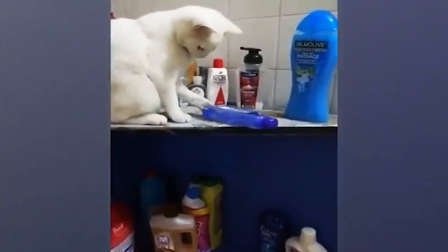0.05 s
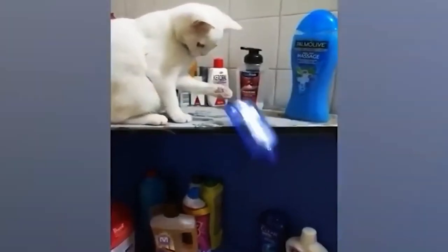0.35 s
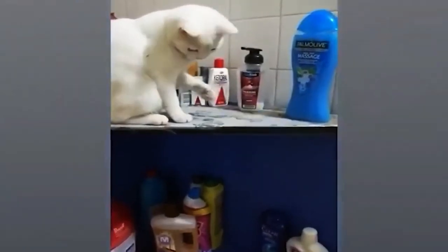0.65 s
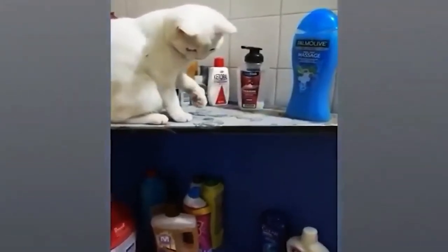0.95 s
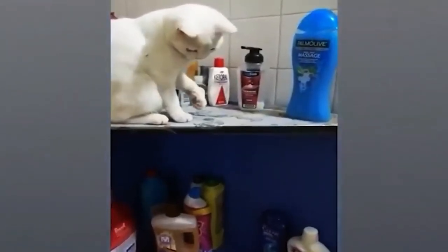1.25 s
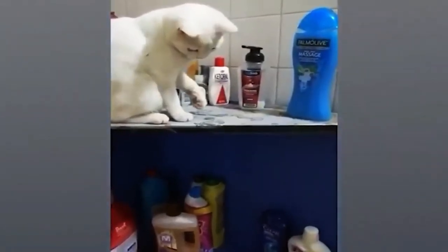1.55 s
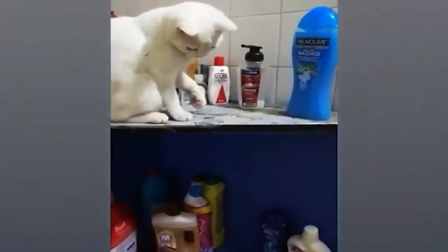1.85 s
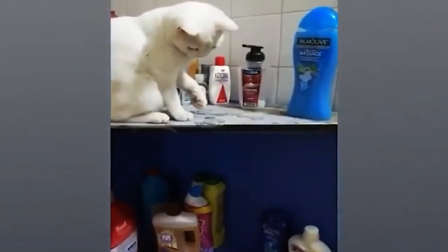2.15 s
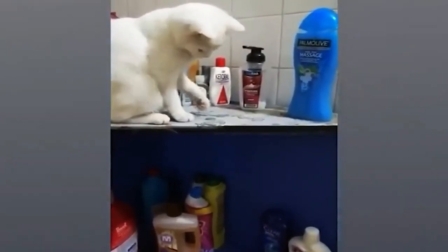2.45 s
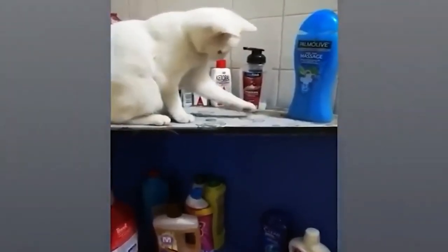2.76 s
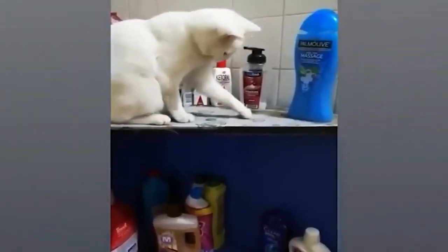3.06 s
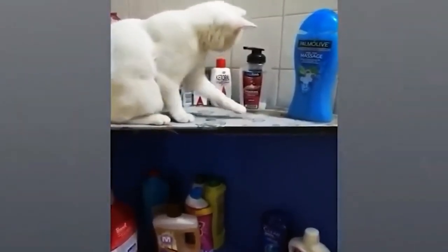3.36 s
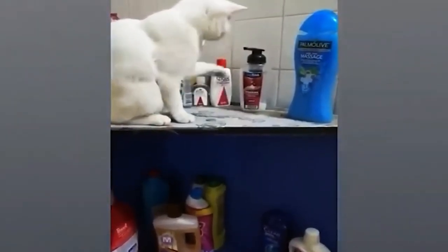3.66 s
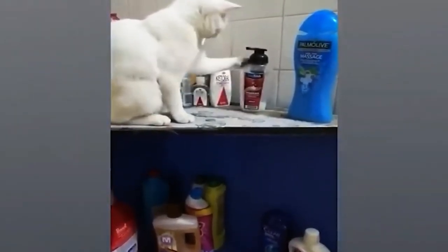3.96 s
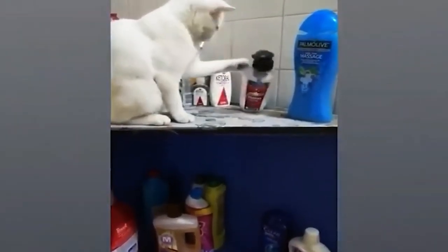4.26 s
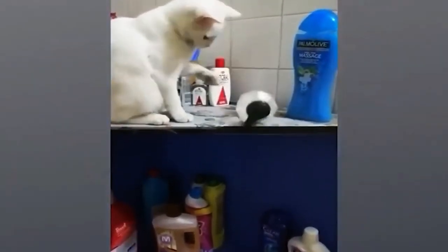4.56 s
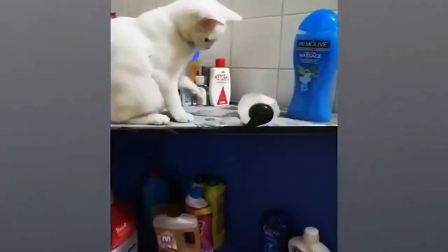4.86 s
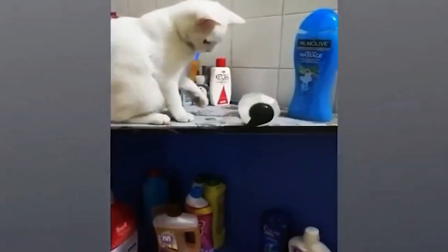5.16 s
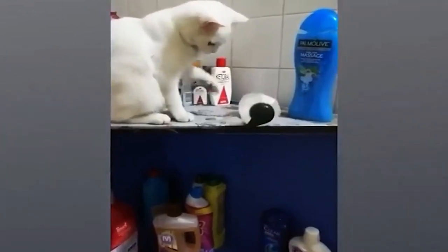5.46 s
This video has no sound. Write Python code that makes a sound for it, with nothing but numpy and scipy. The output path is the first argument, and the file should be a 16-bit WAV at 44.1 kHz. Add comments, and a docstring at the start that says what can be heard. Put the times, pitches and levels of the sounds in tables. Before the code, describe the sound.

A plastic bottle grazes a cupboard and lands on a hard floor with a sharp smack and quick clatter, making the small tiled bathroom boom. After a pause, a cat's paw makes faint taps and clicks. A second bottle then tips over, thuds on a hollow shelf, bounces and rattles to rest. The hand-held phone picks up soft handling bumps over a low rumble and hiss.

```python
"""A small tiled bathroom, heard from inside it on a hand-held phone whose right port faces away.
A cat slides a plastic bottle off a shelf; it grazes the cupboard, smacks on the hard floor at 0.8 s
with shell and cap, and the room booms. From 3 s the cat taps a pump bottle; at 4.6 s it tips over,
thuds on the hollow shelf, bounces and rattles to rest. Throughout, the hand bumps the phone softly
over a low building rumble and the hiss of the ports."""
import sys
import numpy as np
from scipy import signal
from scipy.fft import rfft, irfft
from scipy.io import wavfile

SR = 44100
rng = np.random.default_rng(int(sys.argv[2]) if len(sys.argv) > 2 else 0)


def store_pcm(level_fs):
    """Save levels as 16-bit WAV."""
    pcm = np.round(np.clip(level_fs, -1, 1) * 32767).astype(np.int16)
    wavfile.write(sys.argv[1], SR, np.atleast_2d(pcm).T)


N = 242902
TIME = np.arange(N) / SR
TOP_HZ = 13100  # upper limit of the phone

# Levels are relative within each table.
# the bottle lands on side and base in quick turns, then bounces softly: start_s, level_db, contact_ms
FLOOR_HITS = [(0.7736, 3.5, .16), (0.776, 6.5, .08), (0.78, 5, 0.23), (0.7864, -0.5, 0.072),
              (0.7941, 3.5, .16), (0.8057, -2, 0.099), (0.858, -3, 2.6), (1.012, -19.5, 0.18)]
# its cap clacks on the floor, favouring the modes near one pitch: start_s, level_db, favoured_hz
CAP_CLACKS = [(0.7728, 6, 8600), (0.773, 1.5, 5560), (0.7785, -2, 7500), (0.783, -6, 4850),
              (0.7855, -4, 7400), (0.7875, -2, 9200), (0.7905, -1, 8200), (0.799, -8, 8600)]
# the bottle's hollow body: pitch_hz, level_db, t60_s
BOTTLE_MODES = [(316, -11, .1), (443, -11, .07), (691, 3, .09), (897, 7.5, .09), (1107, 0, .11),
                (1340, -2, .06), (1597, -3, .07), (1708, -6, .06), (1815, 1, .07), (2060, 0, .06),
                (2228, 0, .08), (3010, 3.5, .045), (3290, -1, .05), (3920, -7, .03)]
# its hard cap: pitch_hz, level_db, t60_s
HARD_CAP_MODES = [(4850, -3, .045), (5560, 3, .022), (7450, 0, .028), (8270, 1, .02), (8750, 0, .022),
                  (9200, -3, .018), (10270, -3, .03)]
# its dense wall modes: frequency_hz, level_db
SHELL_SPECTRUM = [(50, -40), (100, -24), (180, -15.5), (300, -8.5), (550, 2), (800, 4.5), (1400, 2),
                  (2200, 6.5), (3100, -0.5), (3900, -3), (6000, -12.5), (9000, -12.5), (13000, -22)]
# the snap of hard plastic: frequency_hz, level_db
SNAP_SPECTRUM = [(200, -11.5), (800, -6.5), (1600, -2), (3700, -14.5), (4500, -5.5), (5600, -14.5),
                 (7500, 4.5), (9300, 2), (10300, -35), (13000, -23)]
# the falling bottle grazes the cupboard: start_s, level_db
CUPBOARD_GRAZES = [(0.559, -25.5), (0.581, -35)]
# the colour of a graze: frequency_hz, level_db
GRAZE_SPECTRUM = [(150, -12), (500, -16.5), (1400, -9), (2300, 5.5), (3200, -10), (5000, -16.5),
                  (12000, -27)]
# paw taps, then the pump bottle falls, bounces and settles: start_s, thud_db, click_db, contact_ms
SHELF_KNOCKS = [(2.979, -53, -37, .6), (2.9887, -51, -28.5, 0.44), (3.4338, -30, -9, 0.11),
                (3.44, -37, -24, 0.48), (4.6286, -16.5, -23.5, 0.59), (4.631, 9.5, -21.5, 0.86),
                (4.641, 3, -26.5, 2.9), (4.746, 5, -14, 5.1), (4.748, 0, -10.5, 3.2),
                (4.757, 0.5, -19, 4.5), (4.7637, -40, -20.5, 2.8), (4.788, -2.5, -16.5, 3.4),
                (4.8286, -12.5, -20, 0.76), (4.873, -26, -24, 0.64)]
# the hollow shelf: pitch_hz, level_db, t60_s
HOLLOW_SHELF_MODES = [(100, -4, .44), (123, -10, .16), (142, -14, .18), (185.5, 3.5, .32), (205, 5.5, .29),
                      (244, -5, .24), (304, -10, .16), (339, 1, .14), (395, -10, .2), (452, -8, .18),
                      (515, -9, .16), (1020, -1, .07), (1104, 1, .08), (1265, -3, .06), (1480, -6, .04)]
# the dense modes of its board: frequency_hz, level_db
BOARD_SPECTRUM = [(30, -28), (70, 17), (130, 7), (250, -5.5), (450, -1.5), (650, -4), (850, -4),
                  (1150, -2.5), (1550, -15.5), (2200, -17.5), (3100, -9.5), (4000, -27), (10000, -18.5)]
# a plastic edge ticks on the shelf: frequency_hz, level_db
TICK_SPECTRUM = [(300, -28), (900, -10), (1700, -10), (3400, -6), (4700, -1.5), (6200, -4.5), (7500, 0.5),
                 (9200, 1), (10300, -7.5), (12500, -14)]
# plastic slides, the paw swipes, the pump bottle rolls: start_s, length_s, level_db, low_edge_hz
SHELF_SLIDES = [(0.0, 0.14, -63, 1490), (0.275, 0.11, -64.5, 2500), (0.382, 0.078, -58.5, 2580),
                (2.981, 0.015, -52.5, 5050), (2.991, 0.0062, -52.5, 4580), (4.786, 0.039, -53, 5000),
                (4.864, 0.014, -49.5, 6500)]
# the room's standing waves: pitch_hz, level_db, t60_s
STANDING_WAVES = [(100, -10, 1.1), (160.6, 0, .52), (186, -9, .6), (214, -6, .5), (261, -2, .7),
                  (302, -3, .54)]
# decay of the room's diffuse tail: frequency_hz, t60_s
TAIL_DECAY = [(100, .65), (300, .58), (800, .49), (2000, .5), (4000, .47), (8000, .4), (13000, .33)]
# the colour of that tail: frequency_hz, level_db
TAIL_SPECTRUM = [(50, -10.5), (150, 6), (300, -1), (500, -4.5), (800, 0.5), (1200, -4.5), (2200, -11.5),
                 (4000, -7), (8000, -5), (13000, 0.5)]
# what the phone's body lets through to the right port: frequency_hz, gain_db
PHONE_SHADOW = [(100, 1), (300, 1), (450, -3), (650, -10), (1200, -11.5), (2200, -8), (3300, -21.5),
                (5500, -19.5), (8000, -32), (12000, -39)]
# the hand on the phone, higher in pitch for a harder touch: start_s, level_db, pitch_hz
HAND_BUMPS = [(0.262, -30, 148), (0.583, -29, 182), (1.432, -16.5, 117), (2.04, -20, 109.6),
              (2.321, -18, 170), (2.325, -5.5, 84.5), (2.409, -13.5, 245), (2.542, -13.5, 90.3),
              (3.114, -18, 107.4), (3.467, -16.5, 93.4), (4.089, -16, 106.2)]
# building rumble and port hiss: frequency_hz, level_db
HUSH_SPECTRUM = [(12, -32), (20, -1), (82, 0.5), (123, -11), (249, -16), (270, -18.5), (309, -19),
                 (531, -26.5), (696, -25), (1410, -23.5), (1950, -27.5), (9390, -29.5), (13000, -38.5)]


def bottle_clatter():
    """The bottle grazes the cupboard, then slaps the floor: its springy wall chatters, its cap cracks."""
    grazes = blows([(s, db, 0) for s, db in CUPBOARD_GRAZES],
                   lambda: burst(GRAZE_SPECTRUM, t60=0.22, crack=0.5))
    chatter = rebounds(FLOOR_HITS, gap_s=0.0033, loss_db=0.5)
    slaps = blows(chatter, lambda: burst(SHELL_SPECTRUM, t60=0.019, crack=0.14))
    cracks = blows([(s, db, 0) for s, db, _ in CAP_CLACKS],
                   lambda: burst(SNAP_SPECTRUM, t60=0.008, crack=0.3))
    return grazes + undb(-3.7) * slaps + undb(-6) * cracks


def bottle_ring(falloff_db_per_octave=35, cap_rise_s=0.004):
    """Each contact rings the flexing body for an instant; the cap's ping jumps in pitch between clacks."""
    out = undb(1) * blows(FLOOR_HITS, lambda: struck(BOTTLE_MODES, detune=0.013))
    for s, db, favoured_hz in CAP_CLACKS:
        modes = [(hz, level - falloff_db_per_octave * abs(np.log2(hz / favoured_hz)), t60)
                 for hz, level, t60 in HARD_CAP_MODES]
        ping = unit(struck(modes) * (1 - fade(cap_rise_s)))
        add(out, s, undb(db) * ping)
    return out


def shelf_thuds():
    """Paw and pump bottle drum on the hollow shelf, and the bottle's rocking roughens each thud."""
    knocks = [(s, db, ms) for s, db, _, ms in SHELF_KNOCKS]
    drum = blows(knocks, lambda: struck(HOLLOW_SHELF_MODES, sharp=0.027))
    rattle = blows(rocking(knocks), lambda: burst(BOARD_SPECTRUM, t60=0.27, crack=0.51))
    return undb(-9) * drum + undb(-10.5) * rattle


def shelf_clicks(times_quicker=6.7):
    """Plastic edges tick on the shelf, letting go much sooner than the weight does."""
    edges = rocking([(s, db, ms / times_quicker) for s, _, db, ms in SHELF_KNOCKS])
    return blows(edges, lambda: burst(TICK_SPECTRUM, t60=0.008, crack=1.3))


def rocking(knocks):
    """The pump bottle rocks onto its other edge after each knock, weaker each time."""
    return rebounds(knocks, gap_s=0.0074, loss_db=20)


def shelf_slides(attack_s=0.006, release_s=0.025):
    """Sliding is a stream of tiny slips that swells, holds and dies away with each push."""
    slips = rng.standard_normal(N) * undb(3.3 * rng.exponential(size=N))
    scrape = colour(slips, [(300, -22.5), (1800, -13.5), (3000, -5), (5000, -3.5),
                            (8000, 0.5), (10500, -6.5), (12500, -14)])
    scrape = np.sqrt(N) * unit(scrape)
    out = np.zeros(N)
    for s, length, db, edge_hz in SHELF_SLIDES:
        swell = np.clip((TIME - s) / attack_s, 0, 1)
        release = np.clip(1 - (TIME - s - length) / release_s, 0, 1)
        out += undb(db) * swell * release * passband(scrape, "high", edge_hz)
    return out


def room_boom(build_s=0.42):
    """The landing wakes the small room's standing waves, a hollow boom that swells and lingers."""
    boom = unit(ring(STANDING_WAVES) * (1 - fade(build_s)))
    out = np.zeros(N)
    add(out, FLOOR_HITS[0][0], undb(1.5) * boom)
    return out


def tiled_corner(sound):
    """A sound with its quick reflections from the tiles and bottles right behind the shelf."""
    flutter = rng.standard_normal(SR) * fade(t60=0.25) * (1 - fade(t60=0.02))
    return sound + undb(-0.5) * convolve(sound, unit(flutter))


def diffuse_tail(build_s=0.13):
    """Dense reflections off the tiles; the treble dies first."""
    spectrum, hz = rfft(rng.standard_normal(SR)), np.arange(SR // 2 + 1)
    tail = 0
    for centre_hz, t60 in TAIL_DECAY:
        band = along([(f, float(f == centre_hz)) for f, _ in TAIL_DECAY], hz)
        tail = tail + irfft(spectrum * band, SR) * fade(t60)
    return unit(colour(tail * (1 - fade(build_s)), TAIL_SPECTRUM))


def bathroom_at_phone(direct, sent, alike_hz=800, lag_s=0.0006):
    """Direct sound and room at two ports that share only the low reflections; the right is shaded."""
    left_tail, other_tail = diffuse_tail(), diffuse_tail()
    alike = 1 / (1 + (np.arange(SR // 2 + 1) / alike_hz) ** 2)
    right_tail = irfft(alike * rfft(left_tail) + np.sqrt(1 - alike ** 2) * rfft(other_tail), SR)
    left, right = (direct + convolve(sent, tail) for tail in (left_tail, right_tail))
    late_right = np.interp(TIME - lag_s, TIME, right)  # the way round the phone
    shade = undb(along(PHONE_SHADOW, np.fft.rfftfreq(N, 1 / SR)))
    return np.array([left, irfft(rfft(late_right) * shade, N)])


def hand_bumps(soft_hz=109, soft_t60_s=0.054, soft_top_hz=127, fidget_count=9, fidget_db=-32.5):
    """Handling knocks reach both ports through the case; the harder, the shorter and brighter."""
    fidgets = [(when * N / SR, fidget_db + 1 - 2 * softness, soft_hz)
               for when, softness in rng.random((fidget_count, 2))]
    out = np.zeros(N)
    for s, db, hz in HAND_BUMPS + fidgets:
        hardness = hz / soft_hz
        knock = ring([(hz, 0, soft_t60_s / hardness ** 1.8)])
        top_hz = min(soft_top_hz * hardness ** 3.3, TOP_HZ)
        add(out, s, undb(db) * passband(knock, "low", top_hz))
    return out


def hush(crossover_hz=260, level_db=-61.8):
    """Low building rumble, alike on both sides, under each port's own hiss."""
    common, *own = rng.standard_normal((3, N))
    rumble = passband(common, "low", crossover_hz)
    ports = [unit(colour(rumble + passband(hiss, "high", crossover_hz), HUSH_SPECTRUM)) for hiss in own]
    return undb(level_db) * np.sqrt(N) * np.array(ports)


def blows(rows, response):
    """Strike response() at each (start_s, level_db, contact_ms); a longer contact is duller."""
    out = np.zeros(N)
    for s, db, contact_ms in rows:
        hold = np.exp(-2 * np.pi * 1000 / SR / max(contact_ms, 0.001))
        add(out, s, undb(db) * signal.lfilter([1 - hold], [1, -hold], response()))
    return out


def rebounds(rows, gap_s, loss_db):
    """Turn each blow into three evenly spaced, ever weaker contacts."""
    return [(s + k * gap_s, db - k * loss_db, ms) for s, db, ms in rows for k in range(3)]


def struck(modes, sharp=0, detune=0, spread_db=2.33):
    """An object hit at a new place: the same modes in another balance, a little detuned if it flexes."""
    chance = rng.standard_normal((len(modes), 2))
    varied = [(hz * (1 + detune * shift), db + spread_db * favour, t60)
              for (hz, db, t60), (favour, shift) in zip(modes, chance)]
    return ring(varied, sharp)


def ring(modes, sharp=0, sag_s=0.031):
    """Damped modes that may start sharp by a fraction and sag back; little radiates below the lowest."""
    clock = TIME[:SR] + sharp * sag_s * (1 - np.exp(-TIME[:SR] / sag_s))
    motion = sum(undb(db) * fade(t60) * np.sin(2 * np.pi * hz * clock) for hz, db, t60 in modes)
    return unit(passband(motion, "high", modes[0][0] / 2))


def burst(spectrum, t60, crack):
    """A crack and many close modes that die away as noise, new for each point of contact."""
    response = unit(rng.standard_normal(SR) * fade(t60))
    response[0] += crack
    return unit(colour(response, spectrum))


def colour(x, points, size=4096):
    """Causal filter with the given (frequency_hz, level_db) spectrum."""
    gain = undb(along(points, np.fft.rfftfreq(size, 1 / SR)))
    cepstrum = irfft(np.log(gain))
    cepstrum[1:size // 2] *= 2  # fold to minimum phase
    cepstrum[size // 2 + 1:] = 0
    return convolve(x, irfft(np.exp(rfft(cepstrum))))[:len(x)]


def passband(x, kind, edge_hz):
    """Second-order low-pass or high-pass."""
    return signal.sosfilt(signal.butter(2, edge_hz, kind, fs=SR, output="sos"), x)


def along(points, hz):
    """Read a (frequency_hz, value) table on a log-frequency axis."""
    f, value = np.transpose(points)
    return np.interp(np.log(np.maximum(hz, 1)), np.log(f), value)


def convolve(x, response):
    """Pass a sound through a response."""
    return signal.fftconvolve(x, response)[:N]


def fade(t60):
    """One second of exponential decay, 60 dB down after t60 seconds."""
    return np.exp(-np.log(1000) * TIME[:SR] / t60)


def add(track, s, sound):
    """Mix a sound in at s seconds."""
    start = int(s * SR)
    track[start:start + len(sound)] += sound[:N - start]


def undb(db):
    """Decibels to gain."""
    return 10 ** (np.asarray(db) / 20)


def unit(x):
    """Scale to unit energy."""
    return x / np.sqrt(np.sum(x ** 2))


def scene():
    """Floor and shelf as heard at the phone; each source feeds the room by its own share."""
    clatter, rings, thuds = bottle_clatter(), bottle_ring(), shelf_thuds()
    clicks_and_slides = shelf_clicks() + shelf_slides()
    direct = clatter + rings + thuds + room_boom() + tiled_corner(clicks_and_slides)
    sent = undb(1.07) * clatter + undb(-12.5) * (rings + thuds) + undb(-12) * clicks_and_slides
    return bathroom_at_phone(direct, sent) + hand_bumps() + hush()


def record(dry, ceiling=0.6):
    """The phone rounds the loudest peaks and cuts the top."""
    rounded = ceiling * np.tanh(dry / ceiling)
    return signal.sosfilt(signal.ellip(8, 0.2, 70, TOP_HZ, fs=SR, output="sos"), rounded)


dry = scene()
out = record(dry)
store_pcm(out)
```